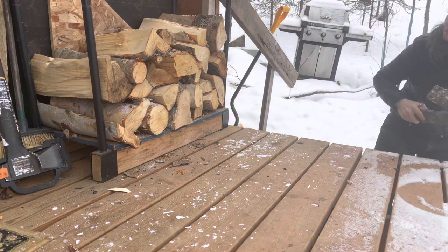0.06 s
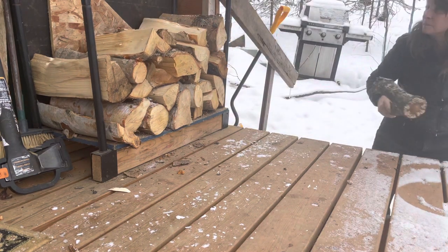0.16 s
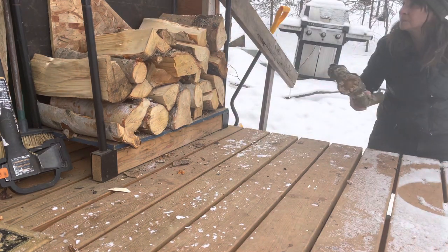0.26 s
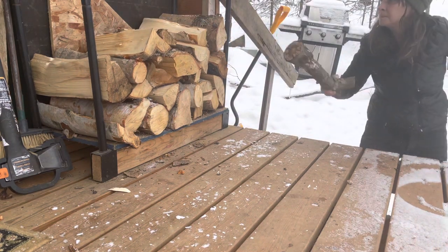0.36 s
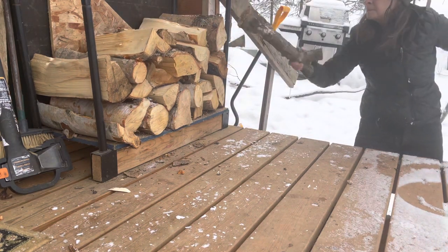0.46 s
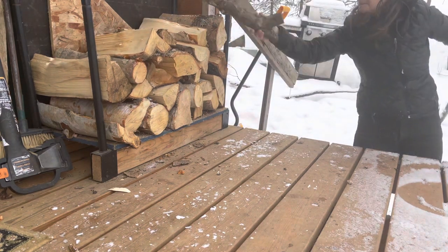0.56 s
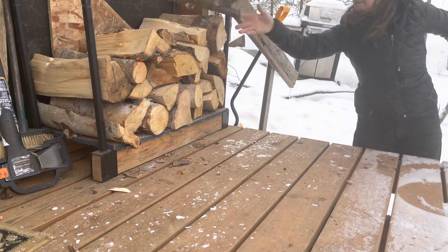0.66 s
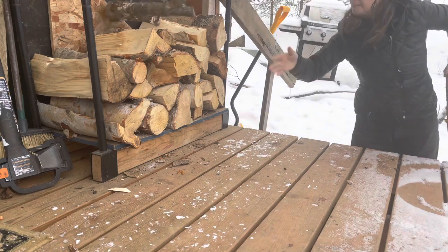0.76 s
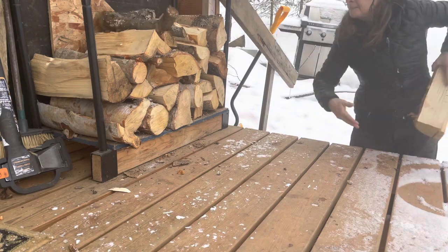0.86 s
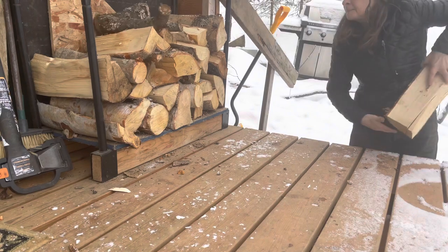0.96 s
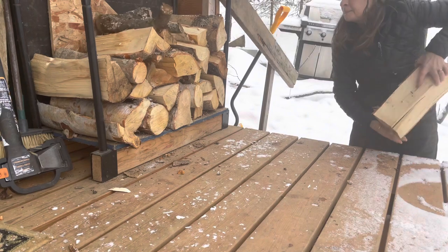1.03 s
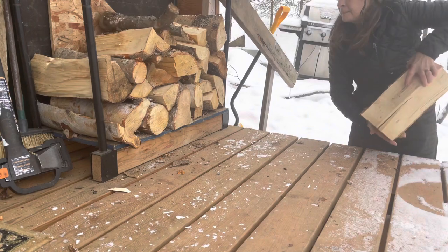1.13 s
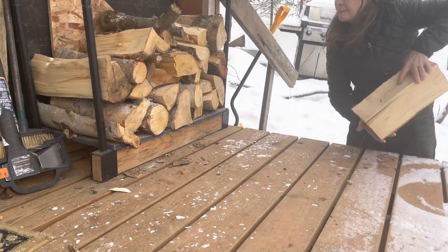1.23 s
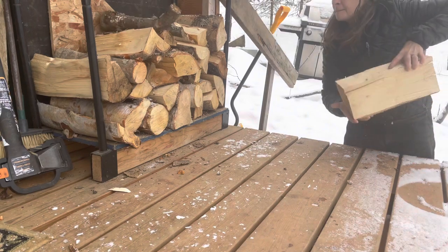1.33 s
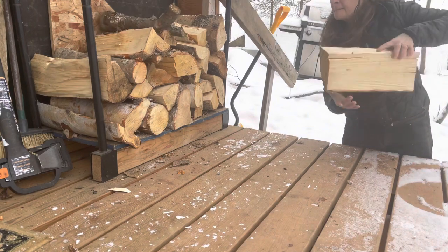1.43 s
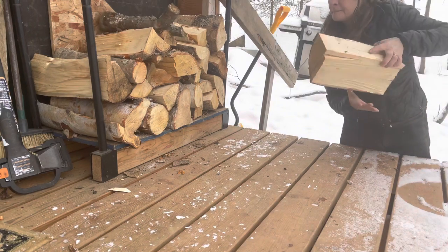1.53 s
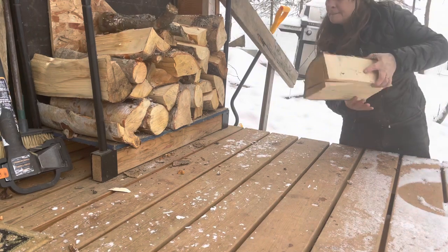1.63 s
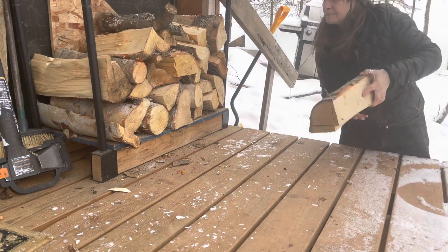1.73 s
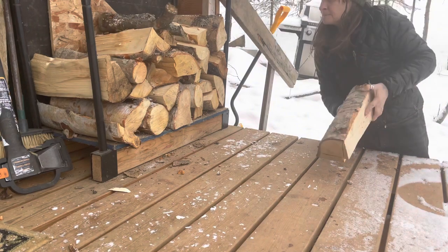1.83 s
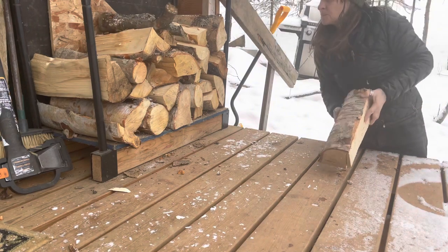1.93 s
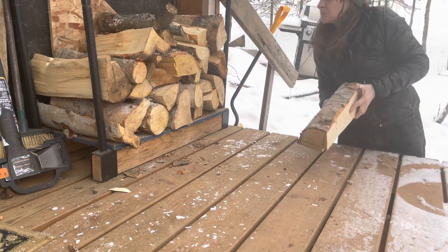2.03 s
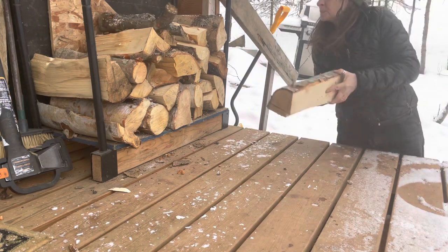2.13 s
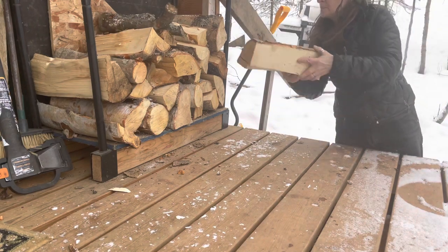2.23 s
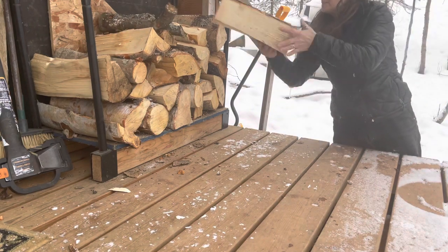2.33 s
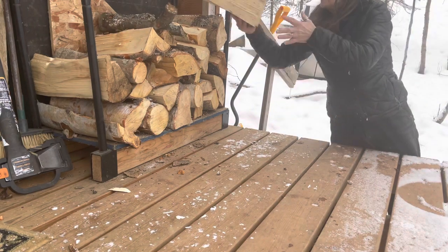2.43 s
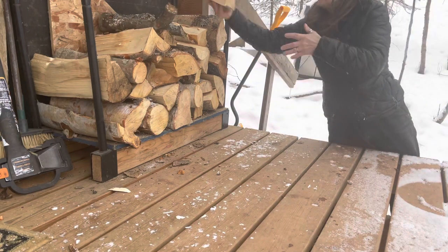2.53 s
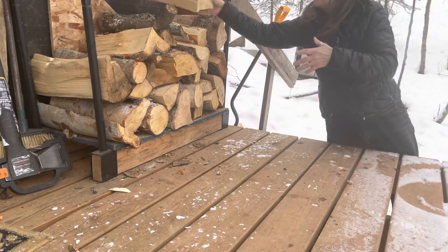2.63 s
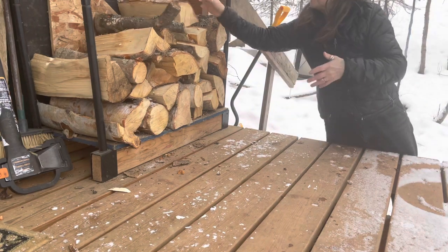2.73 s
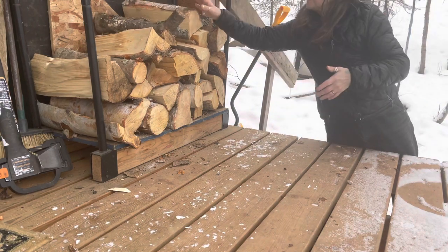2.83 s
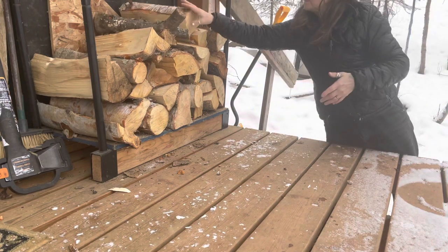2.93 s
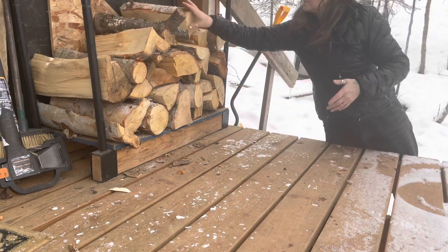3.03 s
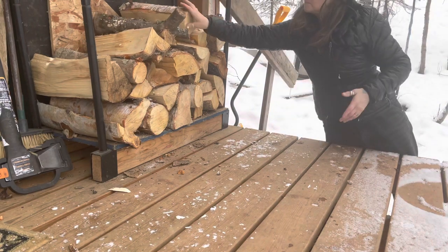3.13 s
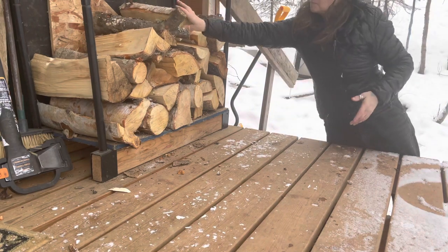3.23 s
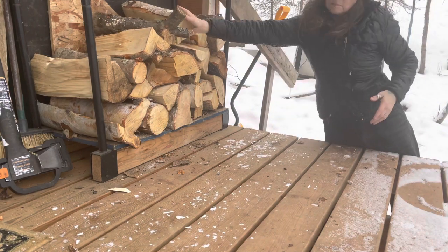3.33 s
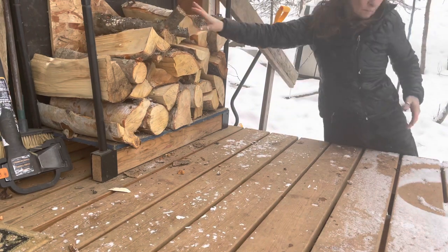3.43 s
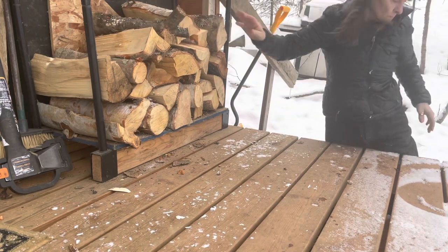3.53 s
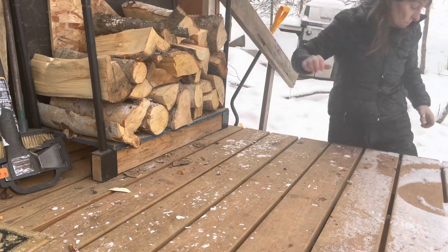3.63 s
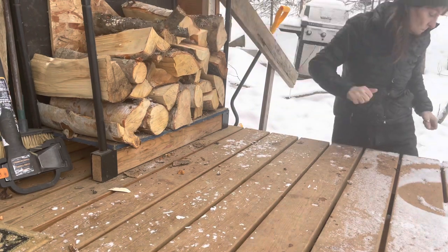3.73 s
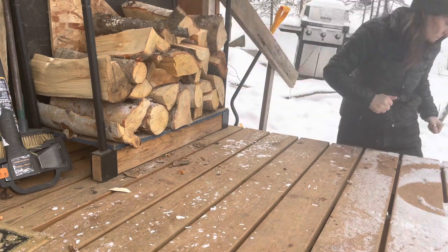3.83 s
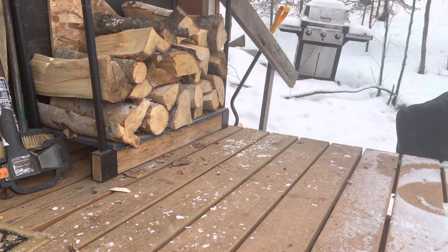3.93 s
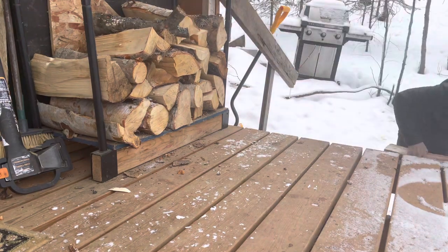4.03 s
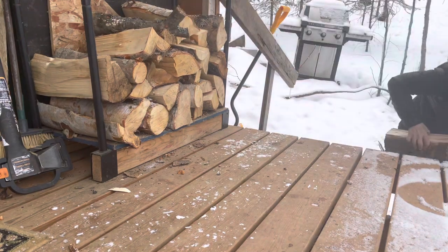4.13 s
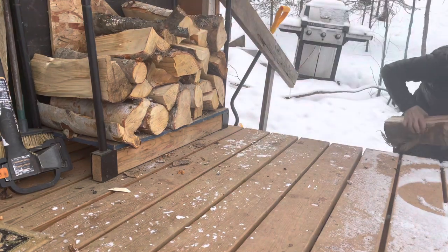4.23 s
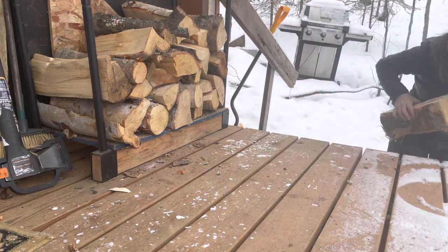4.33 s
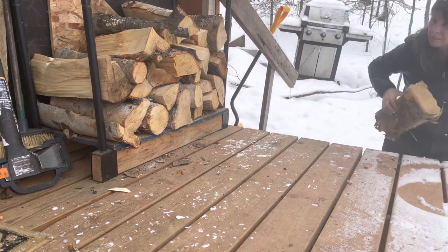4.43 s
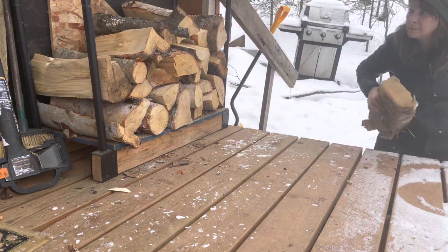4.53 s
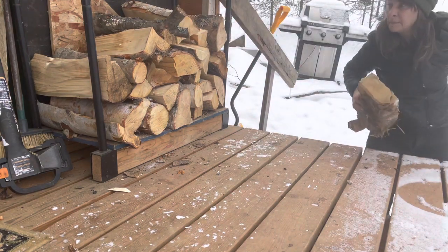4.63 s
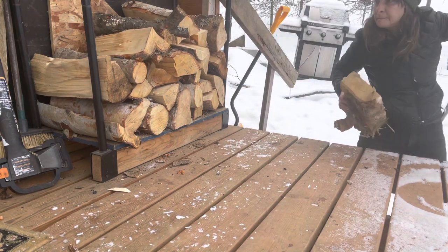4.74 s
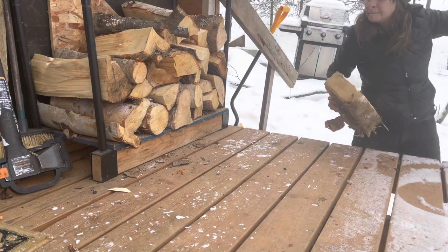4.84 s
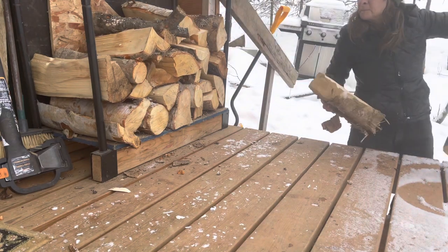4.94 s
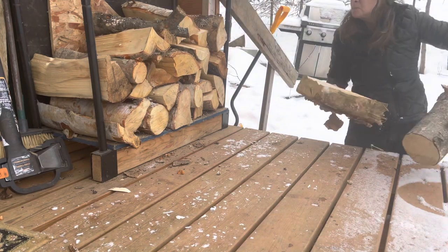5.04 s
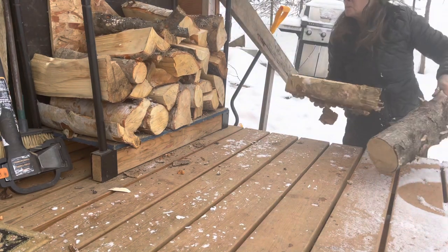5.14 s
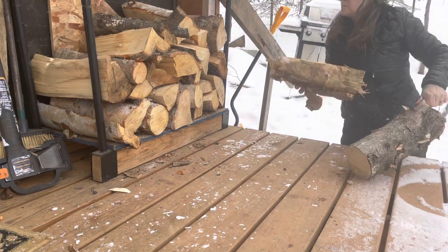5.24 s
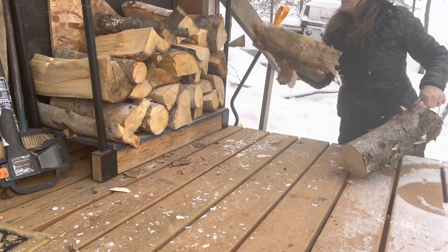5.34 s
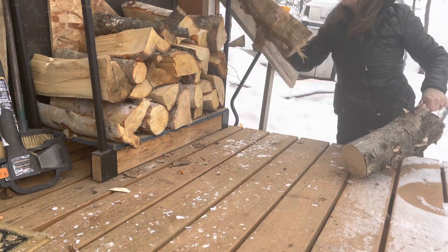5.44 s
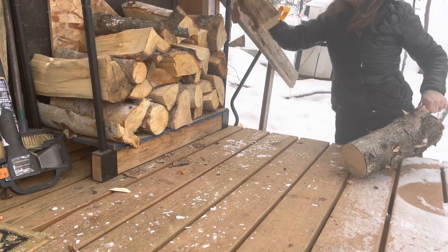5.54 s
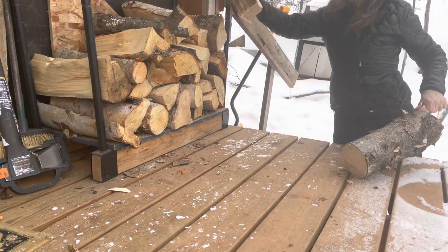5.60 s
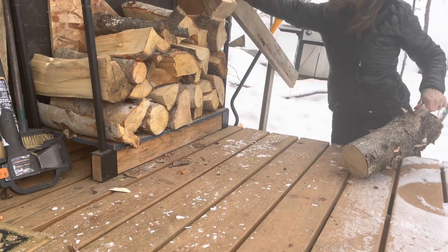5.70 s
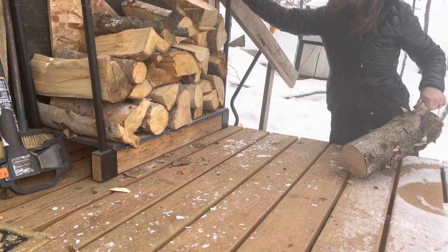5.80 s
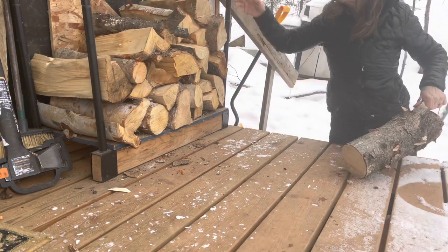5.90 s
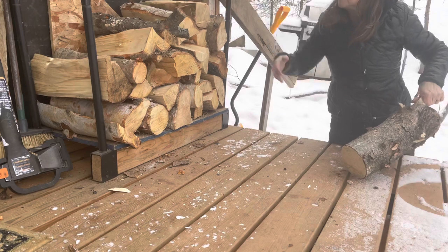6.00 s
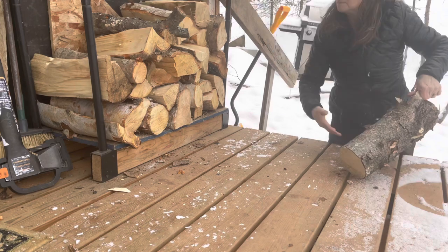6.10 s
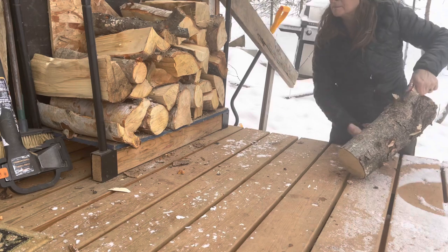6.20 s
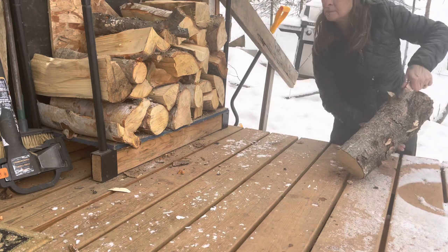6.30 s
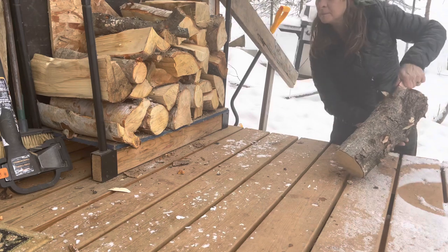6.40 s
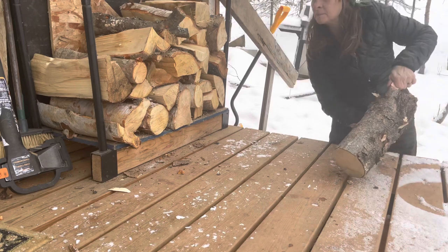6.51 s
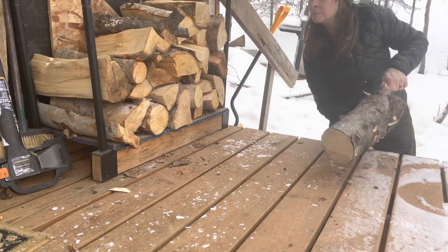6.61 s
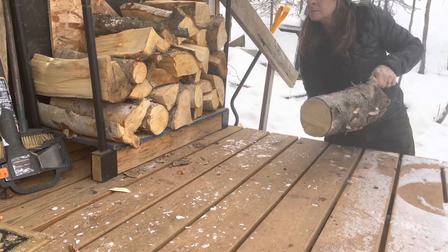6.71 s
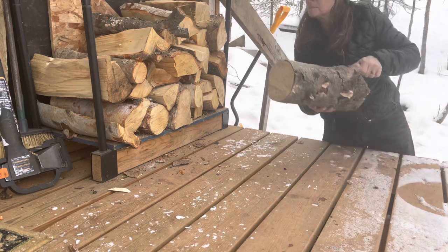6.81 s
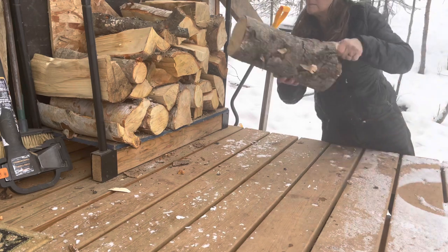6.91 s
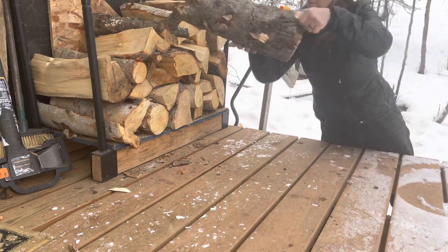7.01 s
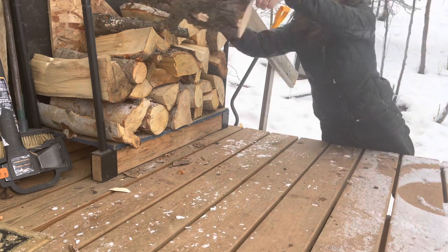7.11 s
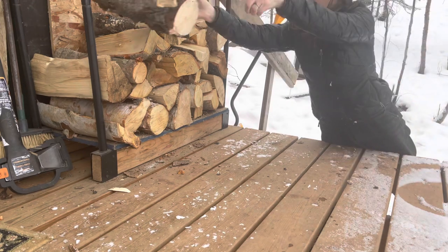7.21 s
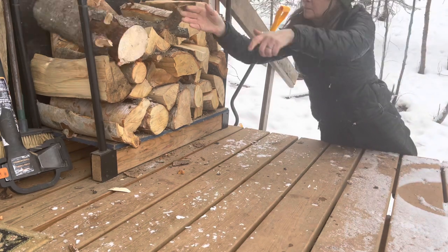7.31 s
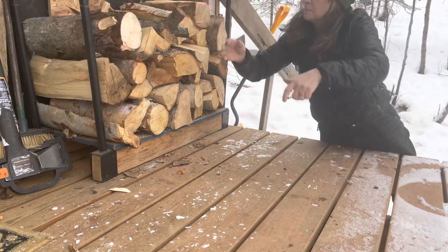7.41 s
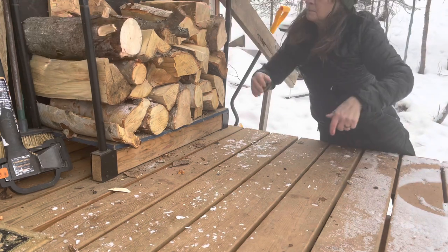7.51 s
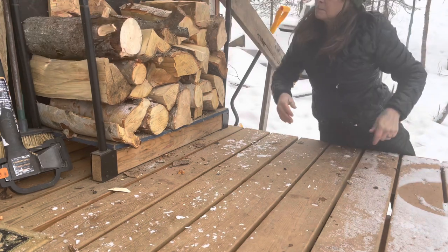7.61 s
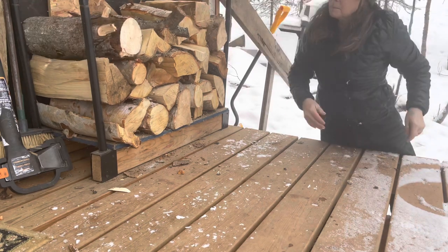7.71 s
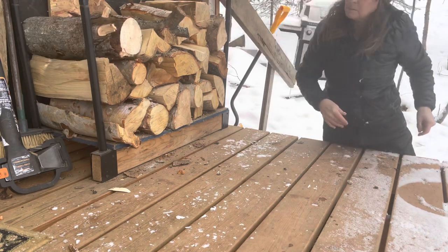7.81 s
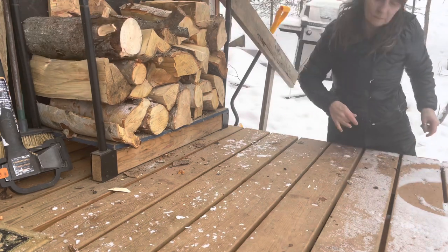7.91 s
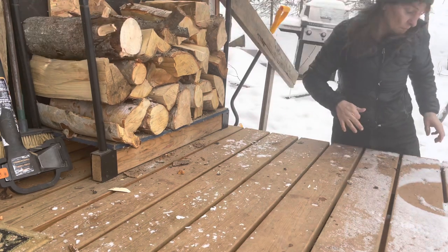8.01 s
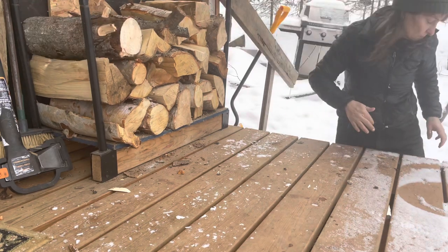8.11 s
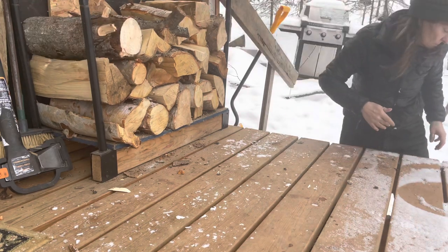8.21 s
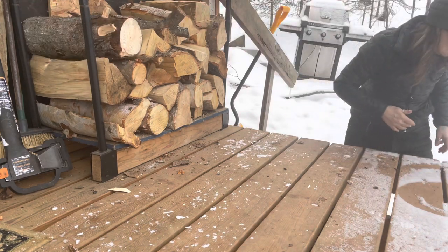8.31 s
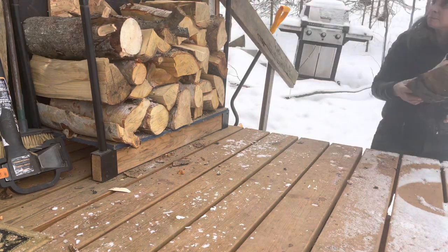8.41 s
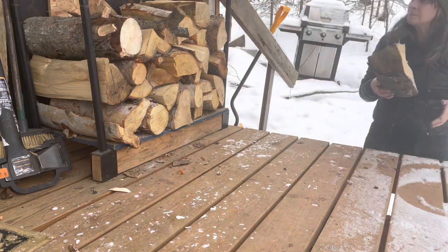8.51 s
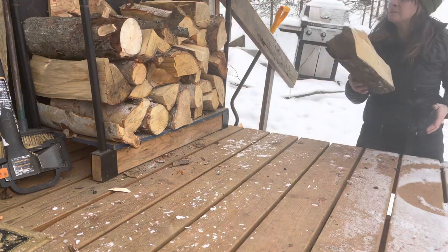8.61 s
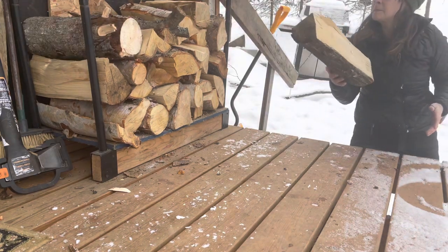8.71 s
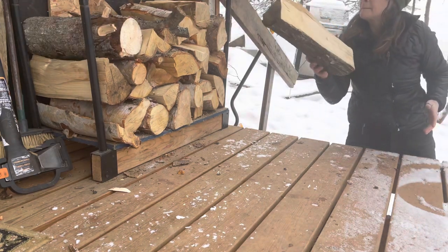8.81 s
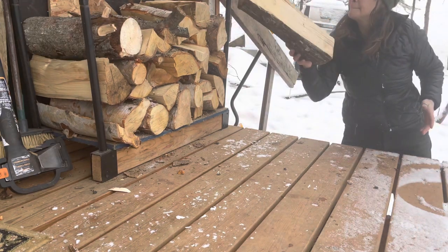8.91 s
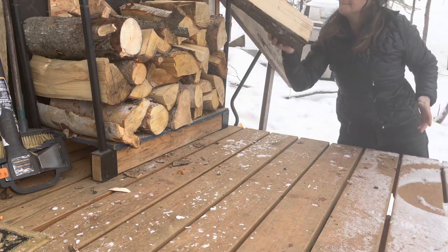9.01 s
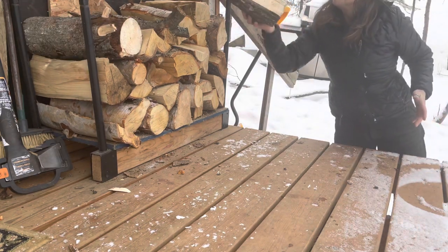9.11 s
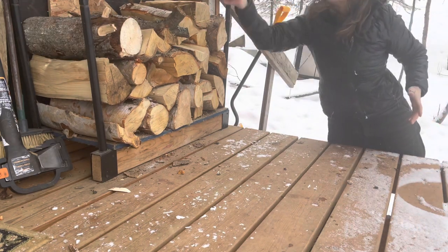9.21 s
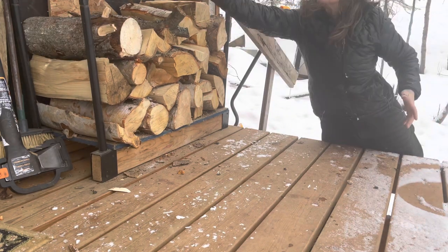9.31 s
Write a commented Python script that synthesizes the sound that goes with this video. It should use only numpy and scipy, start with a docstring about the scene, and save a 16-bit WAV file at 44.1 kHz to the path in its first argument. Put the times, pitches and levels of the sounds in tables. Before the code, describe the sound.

Dry wooden knocks, each with a short board thud and quick small rebounds, come at uneven intervals as logs are piled beside a wall. Between them are crunchy packed-snow footsteps, nylon swishes, and a log juddering and scraping off a heap. A heavy log stands down with a low hollow knock, two hits rattle and roll, and a last log lands. Near, detailed outdoor pickup with brief porch reflections and faint air noise.

```python
"""Firewood is stacked on a steel rack on a wooden deck outdoors in winter; boots crunch, a nylon jacket swishes.
Snow gives way in slips and a log lands; near 2.6 s another lands, bark cracks and the rack shimmers.
After more steps a log judders and rasps off a heap, a sole creaks, and at 5.1 s a round log is set on end.
A log lands before 6 s and knocks again lightly; from 7.2 s come more, a roll, dragging, steps and a last log.
Wood rings in dying modes, bark and snow are bursts of tiny fractures, and thuds sweep down in pitch."""
import sys
import numpy as np
from scipy import signal
from scipy.fft import rfft, irfft, next_fast_len
from scipy.io import wavfile
from scipy.ndimage import uniform_filter1d

SR = 44100
rng = np.random.default_rng(int(sys.argv[2]) if len(sys.argv) > 2 else 0)


def wrap_up_sound(samples):
    """Save the sound to the file named by the first command line argument, as 16-bit audio."""
    columns = np.atleast_2d(samples).T
    # keep every value between -1 and 1, then stretch to whole-number steps
    tamed = np.clip(columns, -1, 1)
    steps = np.round(tamed * 32767).astype(np.int16)
    wavfile.write(sys.argv[1], SR, steps)


N = 412335
T = np.arange(SR) / SR  # the second that follows an impact
NOW = np.arange(N) / SR  # the whole scene
# Source levels in the tables hold before placement and echoes; spectra give the shape of a sound.
# Mode frequencies and decay times hold before the pitch factor and detuning in ring().


def gain_of(db):
    """Decibels to amplitude."""
    return 10 ** (np.asarray(db) / 20)


def evened(x):
    """Scales to an rms of 1."""
    return x / np.sqrt(np.mean(x ** 2) + 1e-20)


def read(points, hz):
    """Reads a curve whose points are joined on a log-frequency axis."""
    f, value = np.transpose(points)
    return np.interp(np.log(hz + 1), np.log(f + 1), value)


def add(mix, s, sound):
    """Lays a sound into the mix at s seconds."""
    part = mix[..., round(s * SR):][..., :sound.shape[-1]]
    part += sound[..., :part.shape[-1]]


def colour(x, spectrum, size=4096):
    """A causal filter of unit energy with the shape of the given spectrum."""
    log_gain = np.log(gain_of(read(spectrum, abs(np.fft.fftfreq(size, 1 / SR)))))
    minimum_phase = np.exp(np.conj(signal.hilbert(log_gain)))
    taps = np.fft.ifft(minimum_phase).real[:size // 2]
    return signal.oaconvolve(x, taps / np.linalg.norm(taps))[:len(x)]


def grains(count, per_s, spread_db):
    """Tiny fractures at random moments, a few of them large."""
    size = gain_of(spread_db * np.minimum(rng.exponential(1, count), 3))
    sign = rng.choice([-1, 1], count)
    happens = rng.random(count) < per_s / SR
    return evened(size * sign * happens)


def ring(modes, pitch, scatter, swell_cycles, spread=1):
    """Dying modes; low ones swell more slowly, and each contact weights them anew as far as spread allows."""
    hz, db, t60 = np.transpose(modes)[:, :, None]
    detune, weight, turn = spread * rng.standard_normal((3, len(modes), 1))
    hz = hz * pitch * (1 + scatter * detune)
    swell = 1 - np.exp(-(T * hz / swell_cycles) ** 2)
    fade = gain_of(db + 2.3 * weight - 60 * T * pitch / t60)
    waves = fade * swell * np.sin(2 * np.pi * hz * T + 2 * turn)
    return waves.sum(0) / np.linalg.norm(gain_of(db))


def strokes(rows):
    """Each movement swells and fades as a smooth bell."""
    return sum(gain_of(db) * np.exp(-((NOW - s) / half) ** 2) for s, db, half in rows)


def stick_slip(depth_db, size):
    """Sliding catches and lets go, so its strength wanders."""
    wander = uniform_filter1d(uniform_filter1d(rng.standard_normal(N), size), size)
    return gain_of(depth_db * evened(wander))


# Quiet outdoor air. Each row: frequency in Hz, level in dB per Hz.
AIR = [(25, -6), (110, 0.5), (300, -11.5), (900, -18.5), (2000, -21), (7200, -33), (9100, -20.5),
       (12200, -47.5)]
AIR_DB = -59


def air():
    """Steady broadband noise of the open air, mostly alike at both microphones."""
    shared, left, right = (colour(rng.standard_normal(N), AIR) for _ in range(3))
    return gain_of(AIR_DB) * evened(shared + 0.13 * np.array([left, right]))


# How long the porch scatter lasts. Each row: frequency in Hz, time to fall 60 dB in seconds.
PORCH_T60 = [(80, 0.71), (1000, 0.31), (9000, 0.42)]
PORCH_DB, PORCH_MONO_HZ = -14.5, 250  # below this the scatter is alike at both microphones


def porch(x):
    """Scatter from the wall, roof and woodpile, each band dying at its own speed, the bass nearly mono."""
    taps = rng.standard_normal((2, SR)) * (rng.random((2, SR)) < 3000 / SR) * (T > .004)
    hz, t, (left, other) = signal.stft(taps, SR, nperseg=256)
    same = 1 / (1 + (hz[:, None] / PORCH_MONO_HZ) ** 2)
    right = same * left + np.sqrt(1 - same ** 2) * other
    fade = gain_of(-60 * t / read(PORCH_T60, hz)[:, None])
    tail = signal.istft(np.array([left, right]) * fade, SR, nperseg=256)[1]
    return signal.fftconvolve(x[None], tail / np.linalg.norm(tail[0]), axes=1)[:, :N]


# The two ports hear a sound from the rack, then from the yard.
# Each phase row: frequency in Hz, lead of the left port in radians.
# Each balance row: frequency in Hz, left minus right in dB.
RACK_PHASE = [(80, .05), (900, .45), (1900, 1.1), (3500, .5), (6500, .6), (8500, -.2), (10500, -2.9),
              (11000, -3.8), (11600, -6.3)]
RACK_BALANCE = [(100, 1.6), (450, 2.5), (1900, 7), (5000, 4.5), (10000, 0)]
YARD_PHASE = [(80, -.05), (500, -.55), (1290, -1.5), (3500, -5.6), (8500, -6.1), (11500, -12)]
YARD_BALANCE = [(900, -.5), (3000, 1.5)]
# Scatter from close by. Each row: frequency in Hz, level in dB.
CLOSE_ECHOES = [(100, -27.5), (600, -3.5), (1800, -1), (9000, -3.5)]


def place(x, phase=RACK_PHASE, balance=RACK_BALANCE, echo_t60=0.034):
    """Two close microphone ports hear the sound, with a brief spray of echoes from whatever is next to it."""
    size = 2 * len(x)
    hz = np.fft.rfftfreq(size, 1 / SR)
    half = gain_of(read(balance, hz) / 2) * np.exp(.5j * read(phase, hz))  # each port takes half the contrast
    taps = rng.standard_normal((2, SR)) * (rng.random((2, SR)) < 4000 / SR) * gain_of(-60 * T / echo_t60)
    echoes = rfft(taps / np.linalg.norm(taps, axis=1, keepdims=True), size)
    echoes = echoes * gain_of(read(CLOSE_ECHOES, hz))
    ports = np.array([half, 1 / half]) * (gain_of(-1.0) + echoes)
    return irfft(rfft(x, size) * ports)[:, :len(x)]


# Sleeves sliding on the jacket. Each row: middle in seconds, level in dB, half length in seconds.
SWISHES = [(0.46, -52, 0.035), (1.02, -57.5, 0.18), (1.74, -56.5, 0.232), (2.25, -54.5, 0.16),
           (2.48, -49.5, 0.037), (3.92, -53.5, 0.037), (4.15, -51.5, 0.19), (6.5, -64, 0.83),
           (7.0, -52.5, 0.062), (7.78, -56, 0.1), (8.06, -52.5, 0.02), (9.15, -57, 0.13)]
# The hiss of nylon. Each row: frequency in Hz, level in dB per Hz.
NYLON = [(200, -2.5), (700, 0.5), (2400, -3.5), (6000, -11), (9200, -1), (11300, 1.5), (12600, -34)]
SNAPS_PER_S, SNAP_DB = 28, -10.5  # creases snap; level against the rubbing threads


def jacket():
    """Nylon threads rub over each other as the arms move, with a crease snapping now and then."""
    threads = stick_slip(1.8, size=900) * grains(N, 10000, 5.2)
    snaps = gain_of(SNAP_DB) * grains(N, SNAPS_PER_S, 1.9)
    return colour(strokes(SWISHES) * (threads + snaps), NYLON)


SLIP_COLOUR_DB = 4  # how much the resonances differ from one slip of snow to the next


def uneven(spectrum):
    """Every patch of snow gives way with resonances of its own."""
    hz = np.geomspace(100, 13000, num=40)
    return np.c_[hz, read(spectrum, hz) + SLIP_COLOUR_DB * rng.standard_normal(len(hz))]


# A boot sinks through packed snow in evenly spaced slips. Each row: start in seconds, number of slips,
# gap in seconds, first slip in dB, last slip in dB, squeak against body in dB.
STEPS = [ (0.168, 4, 0.055, -30, -30.5, -6.5), (3.514, 2, .083, -35.5, -30, -9),
         (3.659, 3, 0.045, -43, -40, -7.5), (4.628, 1, 0.067, -40.5, -43, 3.5),
         (8.258, 2, 0.048, -30, -39.5, -14), (8.445, 3, 0.06, -23, -37, -3.5),
         (8.591, 2, 0.086, -35.5, -30.5, -3)]
# The low body of the crunch and its squeak. Each row: frequency in Hz, level in dB per Hz.
SNOW_BODY = [(80, -23), (180, -5.5), (300, 3), (520, -5), (1300, -13.5), (2500, -39.5)]
SNOW_SQUEAK = [(300, -18.5), (900, 5), (1450, 9.5), (2600, 0), (3500, -9), (6000, -22.5), (13000, -23.5)]
# Boots shuffling through snow. Each row: middle in seconds, level in dB, half length in seconds.
SHUFFLES = [(0.18, -51.5, 0.13), (0.6, -50, 0.037), (4.52, -46.5, 0.09), (4.91, -46.5, 0.051),
            (8.09, -45.5, 0.042)]
# A sole twists in the snow and squeaks. Each row: middle in seconds, level in dB, half length in seconds.
TWISTS = [(4.513, -33, 0.008), (4.534, -33.5, 0.011), (4.576, -31, 0.011)]
# The tone of the twist. Each row: frequency in Hz, level in dB per Hz.
TWIST = [(150, -11), (300, 8), (1200, 5), (2200, -10.5), (9000, -48.5)]
SLIP_RISE_S, SLIP_FADE_S = .001, .008  # time constants
CREAKS_PER_S = 330  # clicks per second of the creak, before the catching and letting go sways this rate


def boots():
    """Snow collapses slip by slip under each step, with gritty shuffles between; a twisting sole creaks."""
    out = np.zeros(N)
    burst = (1 - np.exp(-T / SLIP_RISE_S)) * np.exp(-T / SLIP_FADE_S)
    for start, slips, gap, first_db, last_db, squeak_db in STEPS:
        for k, db in enumerate(np.linspace(first_db, last_db, round(slips))):
            body = colour(burst * grains(SR, 4000, 3.1), SNOW_BODY)
            squeak = colour(burst * grains(SR, 2200, 3.1), uneven(SNOW_SQUEAK))
            add(out, start + k * gap, gain_of(db) * (body + gain_of(squeak_db) * squeak))
    shuffle = strokes(SHUFFLES) * stick_slip(4.6, size=400) * grains(N, 2500, 3)
    cycles = np.cumsum(CREAKS_PER_S * stick_slip(3, size=120)) / SR
    creak = np.diff(np.floor(cycles), prepend=0)  # one click per cycle
    twist = strokes(TWISTS) * evened(evened(creak) + rng.standard_normal(N))
    return out + colour(twist, TWIST) + colour(shuffle, DRAG)


# A log is dragged over the heap beside the deck. Each row: middle in seconds, level in dB,
# half length in seconds.
DRAGS = [(3.93, -54.5, 0.081), (4.17, -41, 0.047), (4.39, -41.5, 0.12), (8.11, -44.5, 0.043),
         (8.37, -57.5, 0.12)]
# The rasp, which also colours the shuffling boots. Each row: frequency in Hz, level in dB per Hz.
DRAG = [(100, -12), (390, 2), (1300, -10.5), (3900, -24.5), (6600, -31), (13000, -25.5)]
# A ridge in the bark catches and lets go with a woody tick. Each row: start in seconds, level in dB.
CATCHES = [(4.135, -39), (4.159, -36.5), (4.223, -36.5), (4.267, -38), (4.307, -39), (4.397, -49),
           (4.421, -37), (8.031, -31), (8.048, -39), (8.105, -54)]
# A log judders as it comes loose from the heap. One row: start in seconds, level in dB,
# fade time constant in seconds.
JUDDER = (3.986, -29.5, 0.061)
# Its dull modes. Each row: frequency in Hz, level in dB, time to fall 60 dB in seconds.
JUDDER_MODES = [(172, 0, .08), (431, -4, .045), (689, -8, .04)]
CATCH_FADE_S, CATCH_RING_DB = .006, -10.5  # fade time constant; ring of the log against the rasp


def dragging():
    """A log judders loose and rasps off the heap, ticking where ridges catch."""
    out = colour(strokes(DRAGS) * stick_slip(2.5, size=250) * grains(N, 4000, 3), DRAG)
    for s, db in CATCHES:
        rasp = colour(np.exp(-T / CATCH_FADE_S) * grains(SR, 3000, 2.9), DRAG)
        woody = gain_of(CATCH_RING_DB) * ring(LOG, 0.85, 0.112, 0.96)
        add(out, s, gain_of(db) * (rasp + woody))
    s, db, fade = JUDDER
    judder = evened(signal.oaconvolve(grains(SR, 500, 1), ring(JUDDER_MODES, 0.96, 0, 0.54))[:SR])
    envelope = (1 - np.exp(-T / CATCH_FADE_S)) * np.exp(-T / fade)
    add(out, s, gain_of(db) * envelope * judder)
    return out


# The pile rocks and the deck rumbles under it. Each row: middle in seconds, level in dB,
# half length in seconds.
ROCKING = [(0.92, -34.5, 0.081), (3.21, -33.5, 0.088), (5.74, -26, 0.021)]
# Modes of the deck frame. Each row: frequency in Hz, level in dB, time to fall 60 dB in seconds.
DECK = [(53, -14.5, 0.23), (55.33, -9.5, 0.7), (67.35, -2.5, 0.31), (84.77, -17.5, 0.75),
        (86.3, -4.5, 0.46), (103, -12.5, 0.63), (120.3, 0.5, 0.16), (134.2, -13, 0.35)]


def rocking():
    """Many small nudges from the settling pile keep the deck's low modes going."""
    rumble = signal.oaconvolve(rng.standard_normal(N), ring(DECK, 0.85, 0, 0.23))[:N]
    return strokes(ROCKING) * evened(rumble)


# A jolt reaches the rack. Each row: start in seconds, level in dB.
RACK_JOLTS = [(2.624, -29), (5.833, -35), (5.917, -40.5), (7.206, -23.5), (7.265, -25.5), (9.31, -22.5)]
RACK_LOW_HZ, RACK_SPAN_HZ = 5720, 680
RACK_T60_LOW, RACK_T60_HIGH = .38, .11  # seconds to fall 60 dB, lowest and highest mode


def rack():
    """Steel rings in a crowd of close modes; the higher ones die sooner, so the shimmer sinks."""
    rise = np.linspace(0, 1, num=40) ** 1.5
    hz = RACK_LOW_HZ + RACK_SPAN_HZ * rise
    t60 = RACK_T60_LOW * (RACK_T60_HIGH / RACK_T60_LOW) ** rise
    modes = np.c_[hz, 0 * rise, t60]  # all at 0 dB before ring() weights them
    out = np.zeros(N)
    for s, db in RACK_JOLTS:
        add(out, s, gain_of(db) * ring(modes, 1, .003, 3.5))
    return out


# A splinter or flake of bark snaps. Each row: start in seconds, level in dB, centre in Hz.
SPLINTERS = [(0.655, -18.5, 2700), (2.595, -23.5, 8400), (2.615, -19.5, 2700), (2.622, -9.5, 9200),
             (2.785, -28.5, 8360), (3.138, -28.5, 9500), (3.835, -45, 4000), (3.947, -34.5, 4230),
             (4.448, -29, 3080), (5.313, -40.5, 2500), (5.757, -13.5, 2170), (7.265, -11, 2340)]
SPLINTER_FADE_S, SPLINTER_OCTAVES = 0.0017, 0.97  # time constant; distance from the centre to -6 dB


def splinters():
    """Dry fibres snap, each with a thin, bright tick."""
    out = np.zeros(N)
    hz = np.geomspace(100, 16000, num=24)
    for s, db, centre_hz in SPLINTERS:
        octaves = np.log2(hz / centre_hz)
        shape_db = -20 * np.log10(1 + (octaves / SPLINTER_OCTAVES) ** 2)
        tick = np.exp(-T / SPLINTER_FADE_S) * grains(SR, 12000, 1.4)
        add(out, s, gain_of(db) * colour(tick, np.c_[hz, shape_db]))
    return out


# A heavy round log is set down on its end. Each row: start in seconds, ring in dB, knock in dB,
# deck boom in dB.
SET_DOWN = [(5.121, -1, -18.5, -23.5), (5.141, -8, -20.5, -9)]
# Its low modes. Each row: frequency in Hz, level in dB, time to fall 60 dB in seconds.
ROUND_LOG = [(229, -17, .42), (255, 0, .07), (283, -14, .38), (415, -12, .15), (680, -20, .12)]
# The dull knock of its end grain. Each row: frequency in Hz, level in dB per Hz.
END_GRAIN = [(100, -6.5), (400, 11), (950, -7), (1300, -17.5), (4000, -30), (11000, -29.5)]
END_FADE_S = 0.029  # time constant


def set_down():
    """The round log meets the deck edge first, then flat: it rings low, its end knocks and the deck booms."""
    out = np.zeros(N)
    for s, ring_db, knock_db, boom_db in SET_DOWN:
        knock = colour(np.exp(-T / END_FADE_S) * grains(SR, 3000, 1.5), END_GRAIN)
        low_ring = ring(ROUND_LOG, 0.95, .004, 0.32, spread=0.64)
        boom = ring(DECK, 1, .02, 0.28)
        add(out, s, gain_of(ring_db) * low_ring + gain_of(knock_db) * knock + gain_of(boom_db) * boom)
    return out


# A log slides over the bark of the pile. Each row: middle in seconds, level in dB, half length in seconds.
SLIDES = [(0.83, -50, 0.071), (2.85, -50.5, 0.053), (3.05, -49, 0.049), (3.14, -50, 0.11),
          (5.72, -41, 0.035)]
# A log rolls over its neighbours. Each row: middle in seconds, level in dB, half length in seconds.
ROLLS = [(7.253, -16.5, 0.021), (7.435, -42.5, 0.022)]


def sliding():
    """Bark drags over bark, catching and letting go; a rolling log rattles the pile."""
    slide = colour(strokes(SLIDES) * stick_slip(2.9, size=300) * grains(N, 3000, 4.5), BARK)
    return slide + colour(strokes(ROLLS) * grains(N, 2700, 1.7), PILE)


# The many logs of the pile together. Each row: frequency in Hz, level in dB per Hz.
PILE = [(80, -15.5), (250, 5.5), (1100, -3), (1500, -14.5), (2500, -20), (10000, -51.5)]
CLATTER_RISE_S, CLATTER_FADE_S = .003, .016  # time constants


def clatter():
    """A blow jostles the logs underneath, which rattle together in a dense, short burst."""
    jostle = (1 - np.exp(-T / CLATTER_RISE_S)) * np.exp(-T / CLATTER_FADE_S)
    return colour(jostle * grains(SR, 2500, 1.1), PILE)


# Modes of a log. Each row: frequency in Hz, level in dB, time to fall 60 dB in seconds.
LOG = [(455, 0.5, 0.015), (571, -3.5, 0.21), (693, -0.5, 0.087), (812, 2.5, 0.046), (935.7, 1, 0.07),
       (1047, 2.5, 0.043), (1126, -5, 0.029), (1250, -7, 0.15), (1799, -12, 0.059), (2544, -17.5, 0.14),
       (3272, -22, 0.0094)]
# Bark breaking and scraping. Each row: frequency in Hz, level in dB per Hz.
BARK = [(150, -27.5), (500, 1), (1600, -6.5), (3600, -11.5), (7200, -7.5), (8800, -1), (10200, -6),
        (11300, -2), (13500, -23.5)]
BARK_RISE_S, CRACK_S, SCRAPE_S = 0.0012, 0.0036, 0.021  # time constants
SCRAPE_DB = -7  # bark snaps, then scrapes on more softly


def contact(knock_db, pitch, bark_db):
    """Wood meets wood: the log rings while its bark snaps and scrapes."""
    snap_and_scrape = np.exp(-T / CRACK_S) + gain_of(SCRAPE_DB) * np.exp(-T / SCRAPE_S)
    rub = (1 - np.exp(-T / BARK_RISE_S)) * snap_and_scrape
    bark = colour(rub * grains(SR, 3000, 5.1), BARK)
    return gain_of(knock_db) * ring(LOG, pitch, 0.0069, 0.82) + gain_of(bark_db) * bark


def bending_wave(start_hz=400, end_hz=92, glide=.006, decay=0.024):
    """High notes run faster along a board than low ones, so a thud arrives as a falling sweep."""
    hz = end_hz + start_hz * np.exp(-T / glide)  # start_hz lies on top of end_hz
    return (1 - np.exp(-T / 0.0018)) * np.exp(-T / decay) * np.sin(2 * np.pi * np.cumsum(hz) / SR)


# Modes of the boards under the pile. Each row: frequency in Hz, level in dB,
# time to fall 60 dB in seconds.
BOARDS = [(150.1, -0.5, 0.11), (191.3, -1.5, 0.077), (251, -4.5, 0.14), (279, -10.5, 0.16),
          (350, -5.5, 0.037), (391.5, -0.5, 0.032), (429.7, -5, 0.057)]


def load(thud_db, boom_db):
    """Weight comes onto the pile: the boards ring and bend in a thud and the deck booms below them."""
    thud = ring(BOARDS, 0.94, 0.011, 1.0) + bending_wave()
    return gain_of(thud_db) * thud + gain_of(boom_db) * ring(DECK, 0.98, 0.026, 0.47, spread=0.39)


REBOUND_S = .033  # a log rocks to rest, one rebound after another
# The second contact, as the weight bears, against the first.
SEAT_KNOCK_DB, SEAT_BARK_DB, SEAT_PITCH = -5, -7, .88


def landing(knock_db, pitch, bark_db, clatter_db, lag, thud_db, boom_db, rebound_db, count=2):
    """One end strikes and jostles the pile; the log seats with its weight, then rebounds ever more softly."""
    out = contact(knock_db, pitch, bark_db) + gain_of(clatter_db) * clatter()
    seat = contact(knock_db + SEAT_KNOCK_DB, pitch * SEAT_PITCH, bark_db + SEAT_BARK_DB)
    add(out, lag, seat + load(thud_db, boom_db))
    for k in range(1, count + 1):
        loss_db = rebound_db * k
        touch = contact(knock_db + loss_db, pitch * rng.uniform(0.78, 1.1), bark_db + loss_db)
        add(out, lag + k * REBOUND_S, touch + gain_of(thud_db + loss_db) * bending_wave())
    return out


# A log lands, or knocks lightly as it settles. Each row: start in seconds, knock in dB,
# pitch factor of the log, bark in dB, clatter of the pile in dB, lag until the weight bears in seconds,
# board thud in dB, deck boom in dB, level change per rebound in dB.
LANDINGS = [ (0.654, -11, 1.03, -24, -10, 0.0039, -2, -8.5, -19.5),
            (2.610, -6.5, 1.0, -20.5, -13, .013, -4.5, -7, -11.5),
            (5.757, -11, 0.99, -19, -37, 0.0016, -13.5, -13, -14.5),
            (5.915, -27, 0.61, -30, -33, 0.0037, -27, -38, -27),
            (7.204, -9.5, 0.96, -10, -17.5, .003, -13.5, -26, -17),
            (7.264, -14.5, 0.8, -20, -16.5, .012, -8.5, -8, -35),
            (9.309, -8, 0.86, -7, -11.5, 0.01, -18.5, -21, -9)]
# A log is nudged or bumps its neighbours. Each row: start in seconds, knock in dB,
# pitch factor of the log, bark in dB, board thud in dB.
NUDGES = [ (0.604, -34, 1.18, -62, -41.5), (0.803, -30.5, 0.74, -39.5, -50), (1.054, -40, 0.68, -58, -36),
          (1.232, -27.5, 2.42, -40.5, -46), (1.676, -36, 0.82, -64, -50), (2.72, -27.5, 1.7, -33, -25),
          (2.83, -33.5, 0.75, -52, -32.5), (2.859, -35.5, 1.3, -56, -30.5), (3.137, -37, 1.1, -44, -32.5),
          (5.681, -44, 0.8, -32, -40), (5.742, -49, 0.56, -23, -25), (5.823, -27.5, 0.82, -25.5, -25),
          (5.834, -28.5, 0.9, -29, -23)]
BOOM_DB = -1  # the deck's boom under a nudged log, against the thud
# A dry branch on top of the pile rings hollow. Each row: frequency in Hz, level in dB,
# time to fall 60 dB in seconds.
BRANCH = [(474, -2, .12), (587, -1, .08), (1245, -8, .1), (2600, -18, .04)]
# Blows to the branch. Each row: start in seconds, level in dB.
BRANCH_BLOWS = [(0.655, -19), (1.054, -31), (2.592, -20.5)]


def firewood():
    """Logs land on the pile, knock as they settle and are nudged into place, and a struck branch rings."""
    out = np.zeros((2, N))
    for s, *log in LANDINGS:
        add(out, s, place(landing(*log)))
    for s, knock_db, pitch, bark_db, thud_db in NUDGES:
        add(out, s, place(contact(knock_db, pitch, bark_db) + load(thud_db, thud_db + BOOM_DB)))
    for s, db in BRANCH_BLOWS:
        add(out, s, place(gain_of(db) * ring(BRANCH, 0.98, 0.0044, 0.66, spread=0.24)))
    return out


def scene():
    """The wood and the arms at the rack, the feet and the heap in the yard beside it, under the porch roof."""
    logs = firewood()
    at_rack = place(set_down() + rack() + sliding() + rocking() + splinters() + jacket())
    in_yard = place(boots() + dragging(), YARD_PHASE, YARD_BALANCE)
    near = logs + at_rack + in_yard
    return near + gain_of(PORCH_DB) * porch(near[0]) + air()


# The highest treble fades out. Each row: frequency in Hz, level in dB.
TREBLE_FADE = [(10000, 0.5), (11900, -4), (12700, -17.5)]
EDGE_HZ = 12700  # band limit


def record(dry):
    """The highest treble fades out and peaks are rounded off near full scale; then the band limit."""
    size = next_fast_len(N + SR)
    treble_gain = gain_of(read(TREBLE_FADE, np.fft.rfftfreq(size, 1 / SR)))
    heard = irfft(rfft(dry, size) * treble_gain, size)[:, :N]
    rounded = heard / (1 + heard ** 6) ** (1 / 6)
    low_pass = signal.firwin(255, EDGE_HZ, window=("kaiser", 8), fs=SR)
    return signal.oaconvolve(rounded, low_pass[None], "same")


dry = scene()
out = record(dry)
wrap_up_sound(out)
```